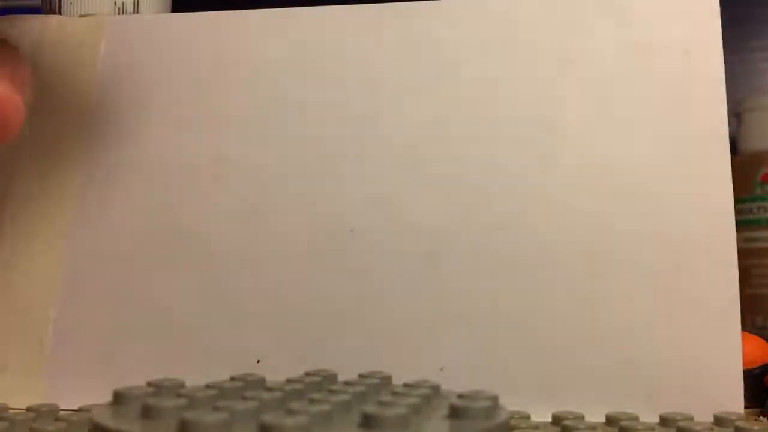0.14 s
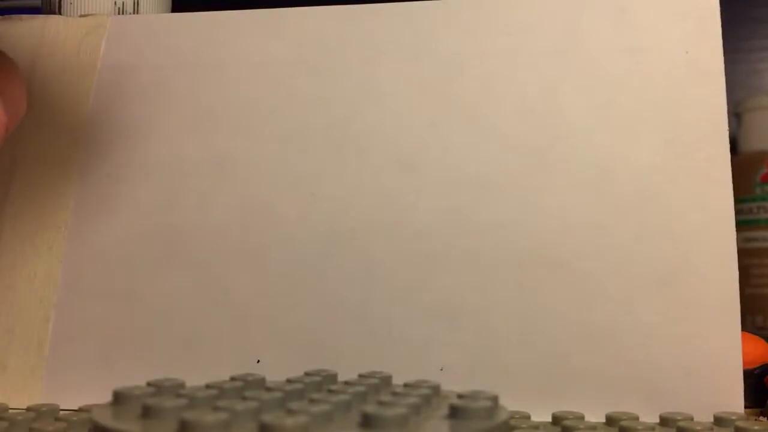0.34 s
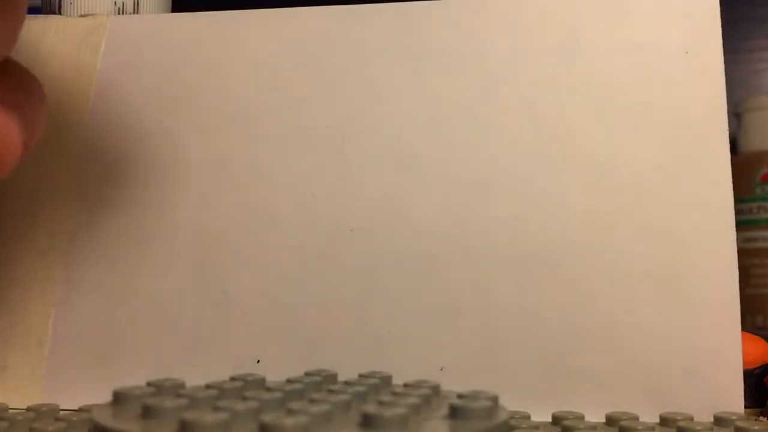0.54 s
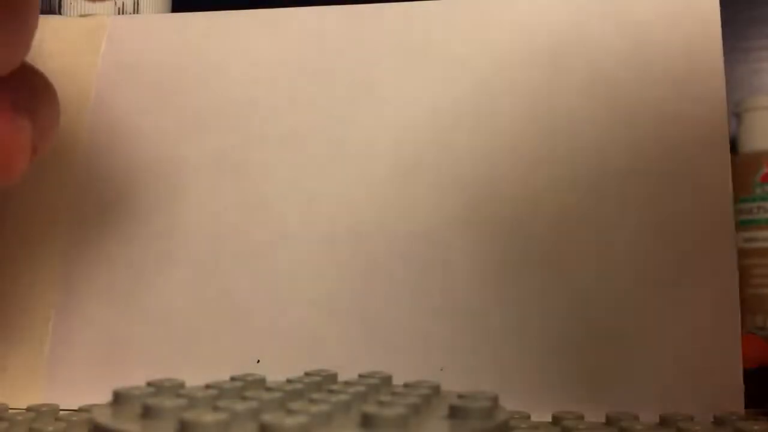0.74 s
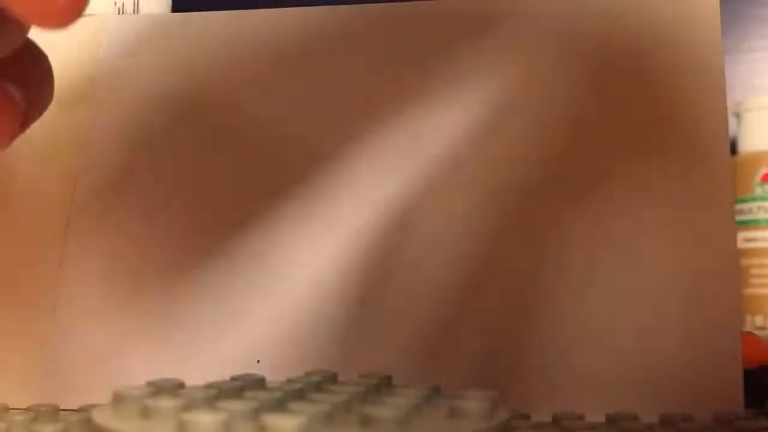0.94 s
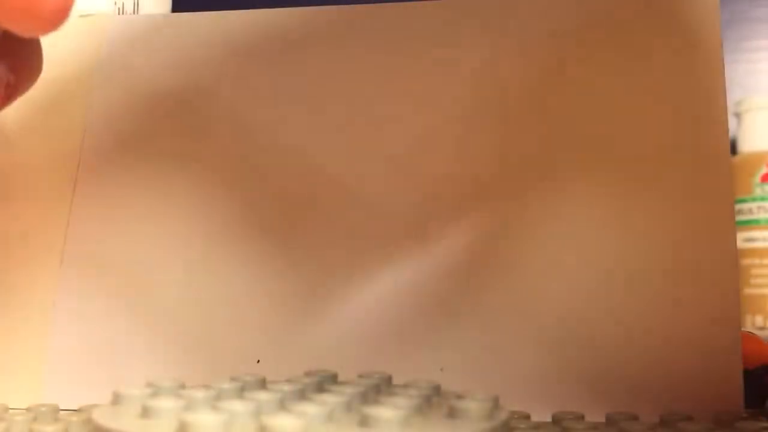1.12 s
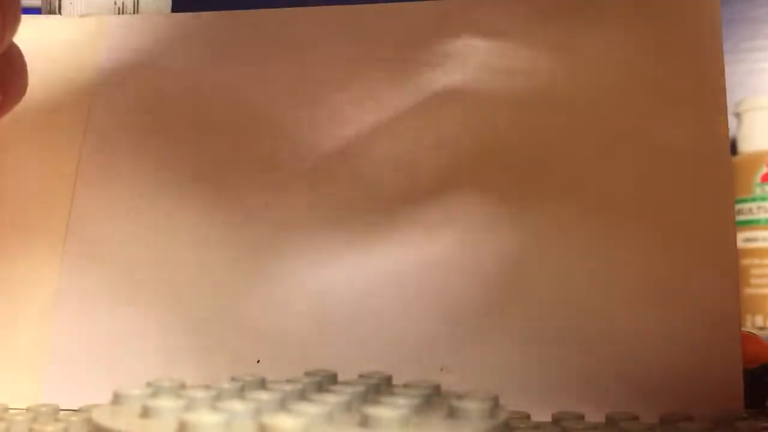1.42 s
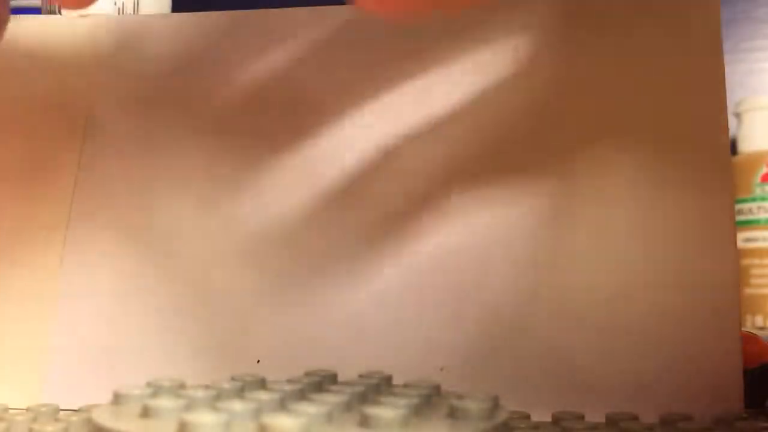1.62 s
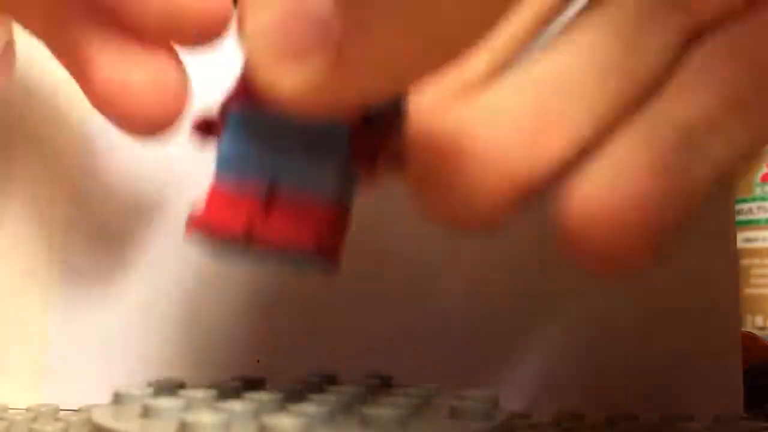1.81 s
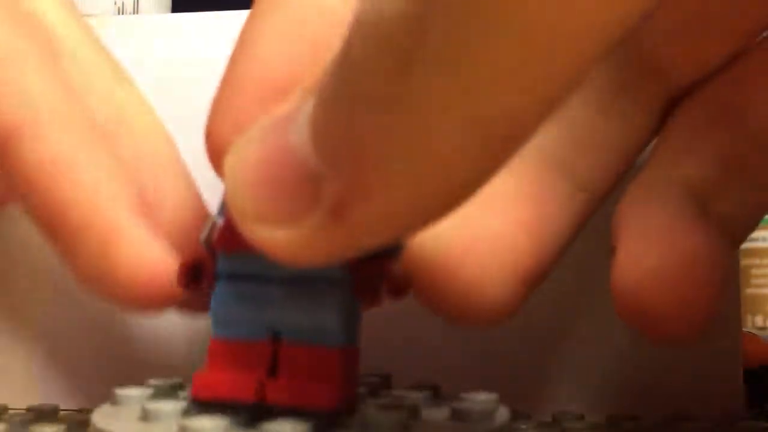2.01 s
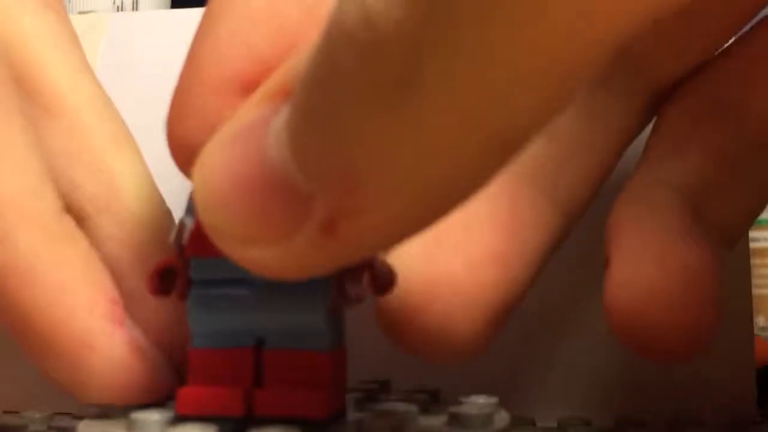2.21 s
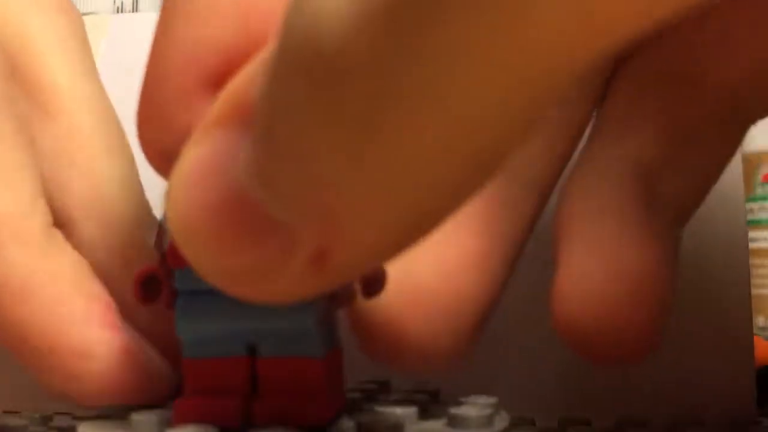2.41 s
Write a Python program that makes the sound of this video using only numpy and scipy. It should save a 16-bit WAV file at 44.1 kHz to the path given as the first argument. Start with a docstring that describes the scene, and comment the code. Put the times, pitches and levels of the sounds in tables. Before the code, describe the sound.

Close up in a quiet, faintly humming room, a finger drags jerkily across stiff paper, ending in a small creak. After a pause, a plastic toy figure clicks sharply onto a studded plate, with a faint scuff and soft bumps.

```python
"""A small quiet room, microphone close to the hands; mains hum and faint hiss throughout.
First a fingertip drags over a stiff paper backdrop in stick-slip jerks that ring the sheet, while small
plastic parts clink. The jerks speed up into a creak. After a lull a finger brushes a plastic toy figure.
At about two seconds the figure is snapped onto a studded plate and pressed home with a faint scuff,
and the fingers bump softly on plate and table."""
import sys
import numpy as np
from scipy import signal
from scipy.fft import rfft, irfft
from scipy.io import wavfile

SR = 44100
rng = np.random.default_rng(int(sys.argv[2]) if len(sys.argv) > 2 else 0)


def wav_out(sig):
    """Save sig, one row per channel (or a flat mono array), as 16-bit PCM at SR to the path in sys.argv[1]."""
    wavfile.write(sys.argv[1], SR, np.round(np.clip(np.atleast_2d(sig).T, -1, 1) * 32767).astype(np.int16))


N = 112454
T = np.arange(N) / SR
RING_T = T[:SR // 5]
TOP_HZ = 15900  # upper edge of the recorder's band

# steady hiss of the room (frequency [Hz], relative level [dB])
HISS_COLOUR = [(20, -30), (45, -9), (95, -7), (150, -11.5), (210, -15.5), (330, -19.5), (700, -24),
               (1500, -26.5), (2600, -27), (15500, -37.5)]
# smooth rubbing of the fingertip between slips (time [s], level [dB])
DRAG_LEVEL = [(.22, -72), (.245, -59), (.285, -67.5), (.32, -58.5), (.41, -52.5), (.44, -57.5),
              (.55, -65.5), (.70, -61), (.745, -82), (.79, -91), (.825, -64), (.89, -64.5), (.92, -72)]
# spectrum of that rubbing (frequency [Hz], relative level [dB])
DRAG_COLOUR = [(100, -6.5), (250, -9.5), (430, 7), (700, 0.5), (1800, 3), (2800, -2.5), (4500, -12.5),
               (7000, -12), (15000, -33.5)]
# slips of the finger on the sheet (time [s], relative level [dB], low-pass cutoff [Hz])
FINGER_SLIPS = [(.2319, -12.5, 4120), (.4481, -1, 15500), (.4604, -14.5, 4600), (.4951, -4.5, 9200),
                (.5271, -6, 7960), (.5564, -7.5, 8000), (.5738, -14.5, 4960), (.5903, -12.5, 4930),
                (.6027, -16.5, 4770), (.6177, -12, 7600), (.6317, -13.5, 4470), (.6431, -16, 7400),
                (.6562, -13.5, 6700), (.6685, -16, 7060), (.6799, -17, 4630), (.6896, -19.5, 4460),
                (.8036, -29, 3280), (.8376, -16.5, 7560), (.8490, -19, 4660), (.858, -20.5, 4130),
                (.8629, -30, 4200), (1.1435, -34, 2580)]
# modes of the paper sheet (frequency [Hz], relative level [dB], t60 [s])
SHEET_MODES = [(218, -12, 0.062), (424, 1, 0.082), (541, -4, 0.061), (1555, 1, 0.041), (1804, -2, 0.019),
               (2067, 4.5, 0.04), (2250, 2.5, 0.042), (2760, 3, 0.0085), (3174, 1, 0.02),
               (3700, 1.5, 0.013), (4220, -3, 0.011), (5065, -8, 0.016), (6530, -7, 0.04),
               (8440, -8.5, 0.012)]
# its dense weaker modes (frequency [Hz], relative level [dB])
SHEET_WASH = [(100, -14), (210, -2), (320, -11.5), (500, -3.5), (700, 2.5), (950, 1.5), (1300, -15),
              (2500, -4.5), (4200, -2), (5800, -3.5), (7500, -1.5), (10000, -7), (16000, -14.5)]
# light contacts of small parts (time [s], relative level [dB], centre pitch [Hz])
CLINKS = [(.2556, -28, 7300), (.3384, -23.5, 9000), (.3452, -17.5, 6200), (.3727, -33.5, 8000),
          (.4845, -30, 7500)]
# modes of those parts (frequency [Hz], relative level [dB], t60 [s])
CLINK_MODES = [(4190, -19.5, 0.026), (6230, 3, 0.032), (7300, -1, 0.029), (9300, 1.5, 0.017),
               (12500, -8, 0.02)]
# their dense modes (frequency [Hz], relative level [dB])
CLINK_WASH = [(500, -28), (2500, 6), (6500, -1), (10000, -1), (12500, -6.5), (14000, -21.5), (16000, -31.5)]
# fingers bumping plate and table (time [s], relative level [dB], pitch [Hz], t60 [s])
FINGER_BUMPS = [(.562, -36, 67, 0.061), (1.63, -39, 400, 0.036), (1.63, -37, 210, 0.13),
                (2.106, -28, 61.5, 0.17), (2.107, -34.5, 271, 0.049), (2.227, -29.5, 351, 0.094),
                (2.405, -45.5, 352, 0.066), (2.5374, -34.5, 777, .04), (2.539, -37, 383, 0.033)]
# runs of tiny slips on the sheet (start [s], end [s], first level [dB], last level [dB])
CREAKS = [(0.697, 0.726, -23, -29.5), (0.8122, 0.818, -30.5, -29), (0.866, 0.892, -28, -27.5),
          (0.887, 0.909, -32, -36.5)]
# a finger brushing the figure (time [s], level [dB])
BRUSH_LEVEL = [(1.585, -90.5), (1.61, -71), (1.63, -72), (1.655, -80), (1.68, -88)]
# spectrum of that brush (frequency [Hz], relative level [dB])
BRUSH_COLOUR = [(300, -19), (1500, -21), (2000, 4), (2450, 4), (3200, -13), (7000, -12), (10000, -9),
                (15000, -27.5)]
# the figure snapping on and settling (time [s], relative level [dB], low-pass [Hz], high-pass [Hz])
STUD_SNAPS = [(2.0981, 0, 5800, 2500), (2.1023, -2, 11500, 585), (2.11, -17, 3000, 100),
              (2.116, -15.5, 5000, 100), (2.2459, -27.5, 4000, 900)]
# modes of figure and plate (frequency [Hz], relative level [dB], t60 [s])
PLATE_MODES = [(360, 1.5, 0.14), (529, -8, 0.046), (692, -2, 0.031), (1354, -1.5, 0.045), (1830, -8, 0.079),
               (2445, -4, 0.019), (2746, -3, 0.014), (3386, 3.5, 0.03), (3560, 2.5, 0.014),
               (4380, 0.5, 0.02), (5220, -18.5, 0.034), (6100, -3.5, 0.013), (7970, -8.5, 0.015),
               (8600, -4.5, 0.016)]
# their dense modes (frequency [Hz], relative level [dB])
PLATE_WASH = [(60, -17), (250, 9), (1000, -6.5), (3500, -0.5), (5500, -5), (7000, -9.5), (9200, -20),
              (12000, -8), (16000, -11)]
# scuff of the feet being pressed home (time [s], level [dB])
SCUFF_LEVEL = [(2.17, -71.5), (2.20, -67), (2.238, -61.5), (2.247, -57), (2.272, -57.5), (2.29, -73),
               (2.31, -84.5)]
# spectrum of that scuff (frequency [Hz], relative level [dB])
SCUFF_COLOUR = [(200, -8), (500, -3.5), (900, -2.5), (1300, 4.5), (2000, -1), (3000, 0), (5000, -4),
                (8500, -5.5), (12000, -10), (16000, -18)]


def amp(db):
    """Decibels to gain."""
    return 10 ** (np.asarray(db) / 20)


def unit(x):
    """Scale to an energy of one."""
    return x / np.sqrt(np.sum(x ** 2))


def level(x, db):
    """Scale to an rms level."""
    return x * amp(db) / np.std(x)


def decay(t60):
    """Envelope that falls 60 dB in t60 seconds."""
    return amp(-60 * RING_T / t60)


def add(out, start_s, x):
    """Mix a sound in at a time."""
    i = int(start_s * SR)
    out[i:i + len(x)] += x[:N - i]


def through(x, response):
    """Pass a sound through an impulse response."""
    return signal.fftconvolve(x, response)[:len(x)]


def lowpass(x, hz, order=3):
    """Butterworth low-pass."""
    return signal.sosfilt(signal.butter(order, hz, fs=SR, output="sos"), x)


def highpass(x, hz, order=3):
    """Butterworth high-pass."""
    return signal.sosfilt(signal.butter(order, hz, "high", fs=SR, output="sos"), x)


def colour(x, points):
    """Minimum-phase filter through points of (frequency [Hz], level [dB])."""
    size = 4096
    hz, db = np.array(points).T
    bins_hz = np.fft.rfftfreq(size, 1 / SR)
    gain = amp(np.interp(np.log(bins_hz + 1), np.log(hz), db))
    cepstrum = irfft(np.log(gain))
    cepstrum[1:size // 2] *= 2  # folding onto positive time makes the filter causal
    cepstrum[size // 2 + 1:] = 0
    return through(x, irfft(np.exp(rfft(cepstrum))))


def ring(modes, sign=-1):
    """Decaying modes, dB giving resonance height. Alternating signs soften the attack; +1 sharpens it."""
    return unit(sum(sign ** k * amp(db) / t60 * decay(t60) * np.sin(2 * np.pi * hz * RING_T)
                    for k, (hz, db, t60) in enumerate(modes)))


def wash(points, t60_low, t60_high, split_hz=1500):
    """Modes too dense to count: coloured noise with one decay for the bass and one for the treble."""
    noise = rng.standard_normal(len(RING_T))
    bass = lowpass(noise, split_hz, order=2) * decay(t60_low)
    treble = highpass(noise, split_hz, order=2) * decay(t60_high)
    return unit(colour(bass - treble, points))


def friction(curve, points, catches_per_s=5000, scatter_db=0.5):
    """Dense tiny catches of one surface on another, under a level curve."""
    catches = rng.random(N) < catches_per_s / SR
    grains = catches * rng.standard_normal(N) * amp(scatter_db * rng.standard_normal(N))
    times, db = np.array(curve).T
    envelope = amp(np.interp(T, times, db)) * (T > times[0]) * (T < times[-1])
    return level(colour(grains, points), 0) * envelope


def room_tone(hum_hz=121.1, waver_depth=0.099, rumble_hz=57):
    """The room by itself: wavering mains hum, low rumble and steady hiss."""
    waver = level(lowpass(rng.standard_normal(N), hz=6, order=2), 0)
    hum = level((1 + waver_depth * waver) * np.sin(2 * np.pi * hum_hz * T), db=-71)
    hiss = colour(rng.standard_normal(N), HISS_COLOUR)
    hiss *= amp(-74.5) / np.std(highpass(hiss, hz=200, order=4))  # level set by the part above 200 Hz
    rumble = through(rng.standard_normal(N), ring([(rumble_hz, 0, 0.25)]))
    return hum + level(rumble, db=-86) + hiss


def finger_drag():
    """The fingertip rubs smoothly over the paper between slips."""
    return friction(DRAG_LEVEL, DRAG_COLOUR)


def bending_wave(x, travel_s):
    """Treble outruns bass in a sheet, so a click chirps down; travel_s is the crossing time at 2 kHz."""
    size = 4 * len(x)
    hz = np.fft.rfftfreq(size, 1 / SR)
    turns = travel_s * (2 * np.sqrt(2000 * hz) - hz * np.sqrt(2000 / TOP_HZ))  # no delay at TOP_HZ
    return irfft(rfft(x, size) * np.exp(-2j * np.pi * turns), size)[:len(x)]


def paper_sheet():
    """Each slip is a force pulse on the sheet; the wave spreads and returns once from the edge."""
    modes = ring(SHEET_MODES)
    edge_echo = amp(-15) * bending_wave(modes, travel_s=0.0079)
    dense = amp(-8.5) * wash(SHEET_WASH, t60_low=0.076, t60_high=0.038)
    response = bending_wave(modes + edge_echo + dense, travel_s=0.001563)
    force = np.zeros(N)
    for start, db, cutoff_hz in FINGER_SLIPS + creak_slips():
        add(force, start, amp(db) * lowpass(signal.unit_impulse(SR // 100), cutoff_hz, order=5))
    return amp(-1.5) * through(force, response)


def plastic_clinks(width_octaves=0.12):
    """Small hard parts touch; a contact mostly rings the modes near its own pitch."""
    out = np.zeros(N)
    for start, db, centre_hz in CLINKS:
        modes = []
        for hz, mode_db, t60 in CLINK_MODES:
            detuning = np.log2(hz / centre_hz) / width_octaves
            modes.append((hz, mode_db - 20 * np.log10(1 + detuning ** 2), t60))
        strongest_db = max(mode_db for _, mode_db, _ in modes)
        dense = amp(-3) * wash(CLINK_WASH, t60_low=0.03, t60_high=0.0345)
        add(out, start, amp(db) * (amp(strongest_db) * ring(modes) + dense))
    return out


def finger_bumps():
    """Soft fingertips knock plate and table: one damped mode and a dull pat each."""
    out = np.zeros(N)
    for start, db, hz, t60 in FINGER_BUMPS:
        burst = rng.standard_normal(len(RING_T)) * decay(t60)
        pat = amp(-7) * unit(lowpass(burst, 2 * hz, order=2))
        add(out, start, amp(db) * (ring([(hz, 0, t60)]) + pat))
    return out


def creak_slips(slips_per_s=220, cutoff_hz=3850, jitter=0.31, scatter_db=3):
    """Tiny uneven slips, so close together that the sheet creaks; rows as in FINGER_SLIPS."""
    slips = []
    for start, end, first_db, last_db in CREAKS:
        time = start
        for gap, strength in rng.standard_normal((32, 2)):
            if time < end:
                db = np.interp(time, [start, end], [first_db, last_db]) + scatter_db * strength
                slips.append((time, db, cutoff_hz))
            time += np.exp(jitter * gap) / slips_per_s
    return slips


def finger_brush():
    """Skin slides lightly over the plastic figure in passing."""
    return friction(BRUSH_LEVEL, BRUSH_COLOUR)


def stud_snaps():
    """The feet snap over the studs; each contact rings figure and plate in its own band."""
    out = np.zeros(N)
    modes = ring(PLATE_MODES, sign=1)
    for start, db, high_hz, low_hz in STUD_SNAPS:
        dense = amp(-2) * wash(PLATE_WASH, t60_low=0.089, t60_high=0.043)
        snap = highpass(lowpass(modes + dense, high_hz), low_hz, order=2)
        add(out, start, amp(db) * snap)
    return amp(-4) * out


def seating_scuff():
    """Plastic rubs grainily on plastic as the feet are pressed home."""
    return friction(SCUFF_LEVEL, SCUFF_COLOUR, catches_per_s=8200, scatter_db=3)


def small_room(x, t60=0.15, first_echo_s=0.008, tail_db=-30):
    """This close to the source, the walls add only a faint, dull tail."""
    noise = lowpass(rng.standard_normal(len(RING_T)), hz=7000, order=1)
    tail = unit(noise * decay(t60) * (RING_T > first_echo_s))
    return x + amp(tail_db) * through(x, tail)


def scene():
    """Paper, then figure, heard from one close position over the room tone."""
    paper = paper_sheet() + finger_drag()
    plastic = plastic_clinks() + seating_scuff() + finger_brush() + stud_snaps()
    return (small_room(paper + plastic + finger_bumps()) + room_tone())[None]


def record(dry):
    """The small microphone loses the deep bass; the recorder cuts the top."""
    microphone = highpass(dry, hz=42.16)
    top_cut = signal.ellip(10, 0.2, 70, TOP_HZ, fs=SR, output="sos")
    return signal.sosfilt(top_cut, microphone)


dry = scene()
out = record(dry)
wav_out(out)
```